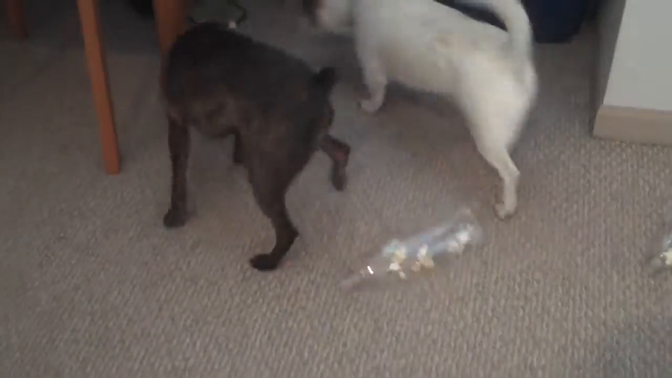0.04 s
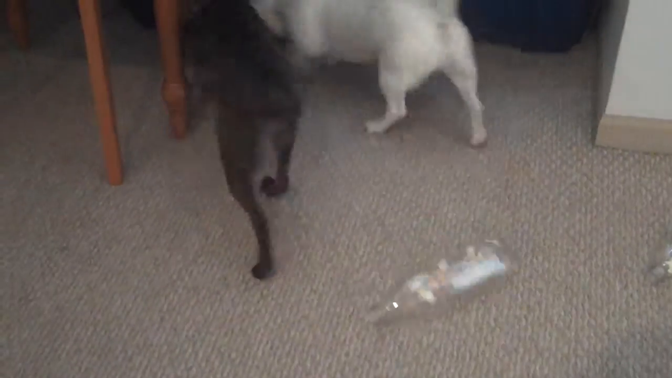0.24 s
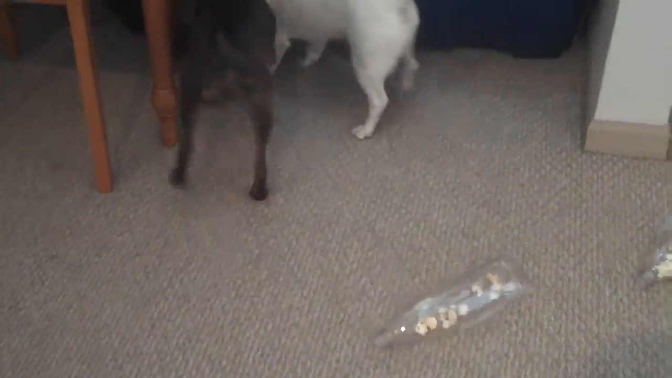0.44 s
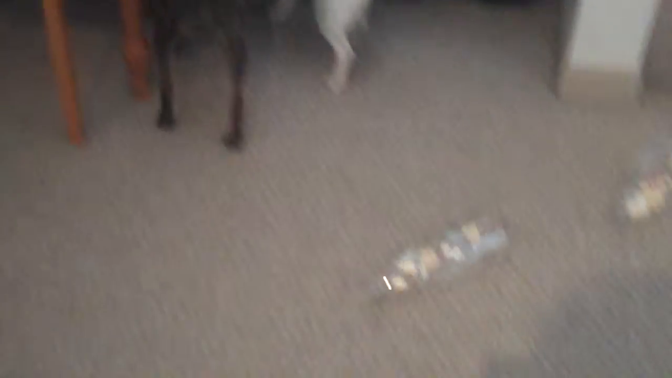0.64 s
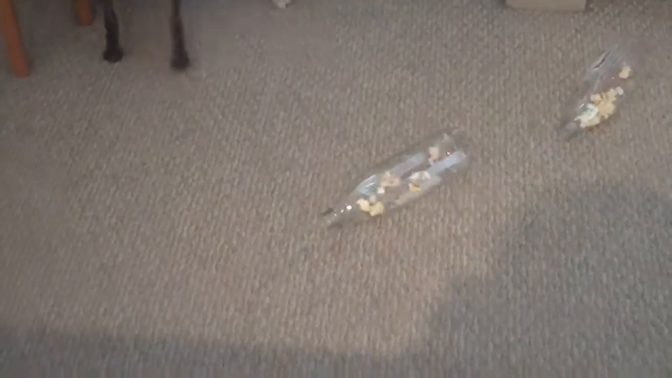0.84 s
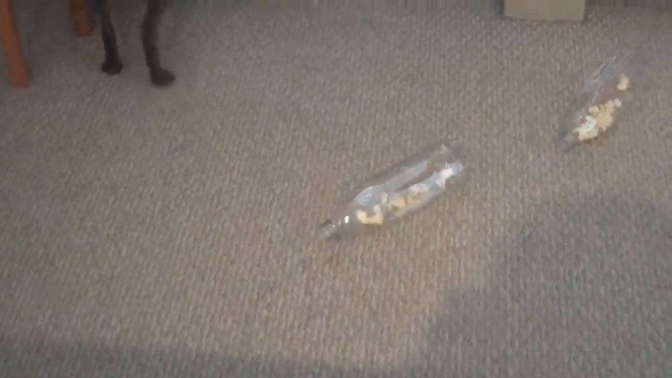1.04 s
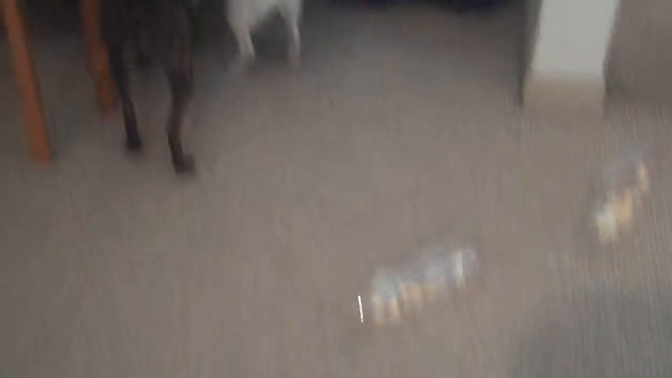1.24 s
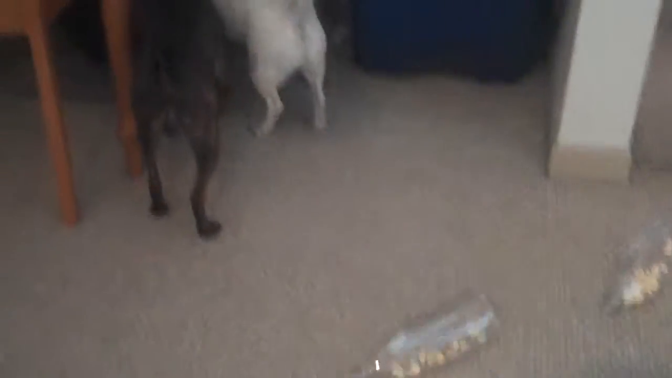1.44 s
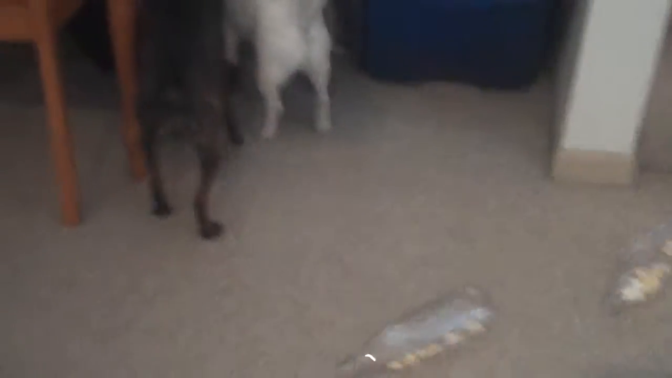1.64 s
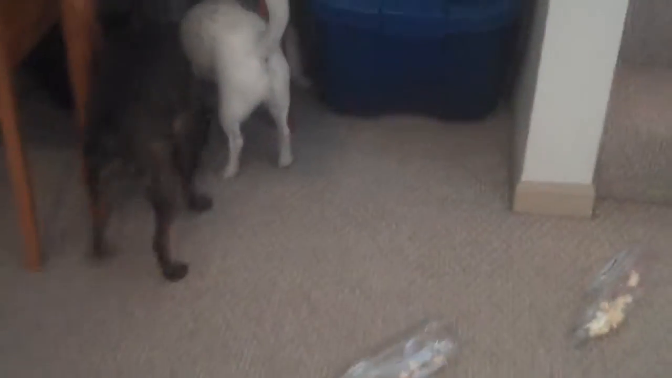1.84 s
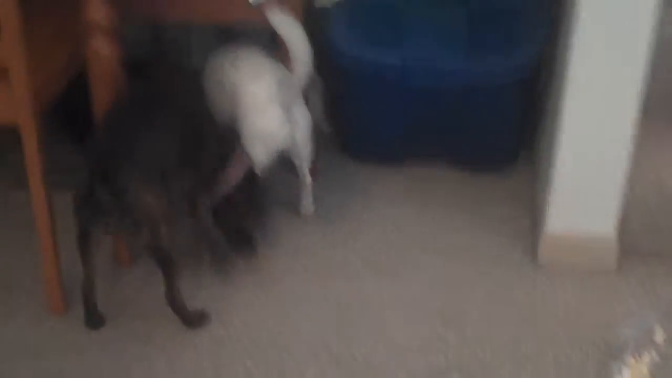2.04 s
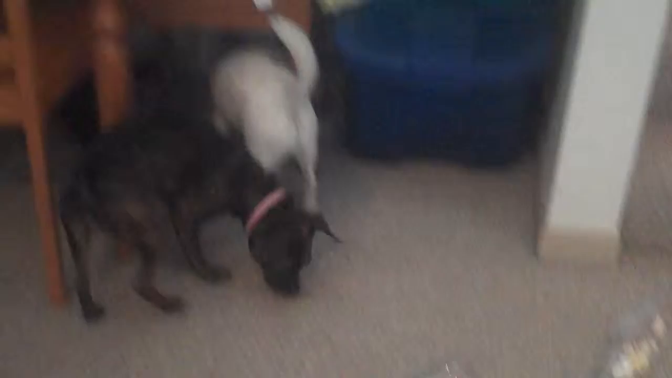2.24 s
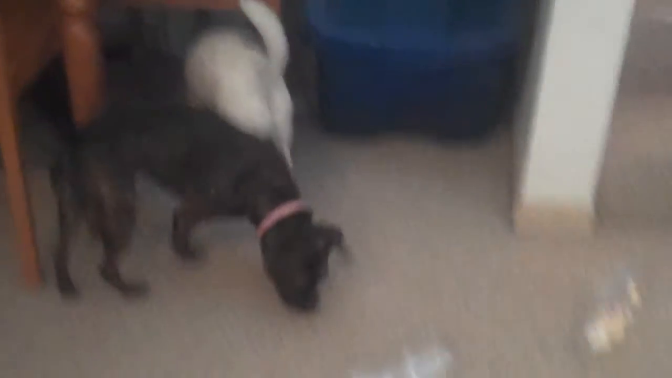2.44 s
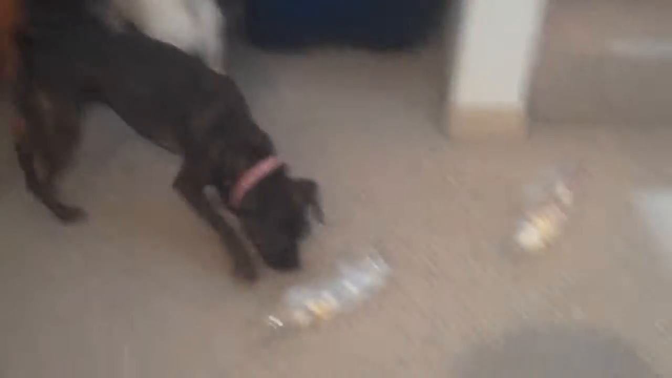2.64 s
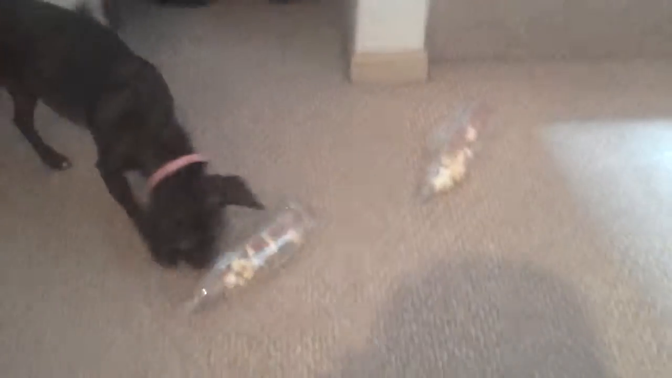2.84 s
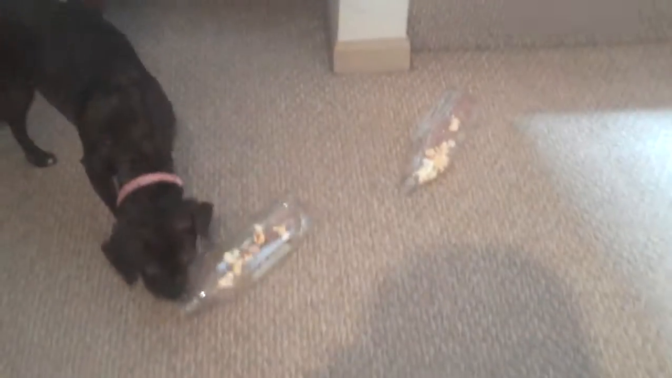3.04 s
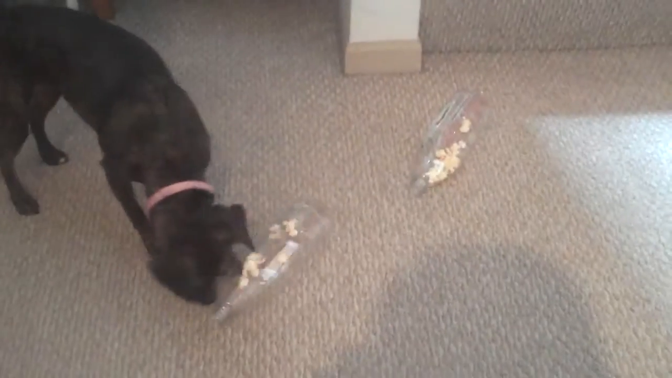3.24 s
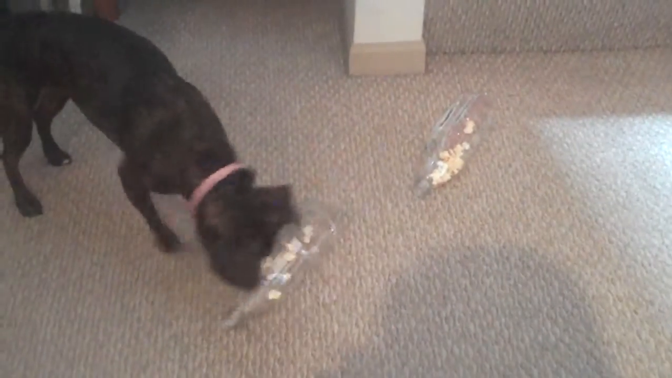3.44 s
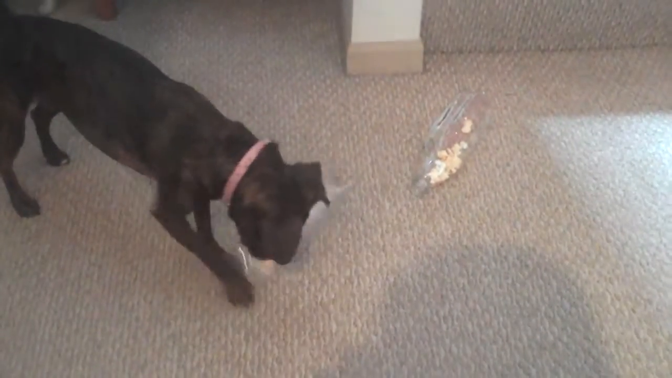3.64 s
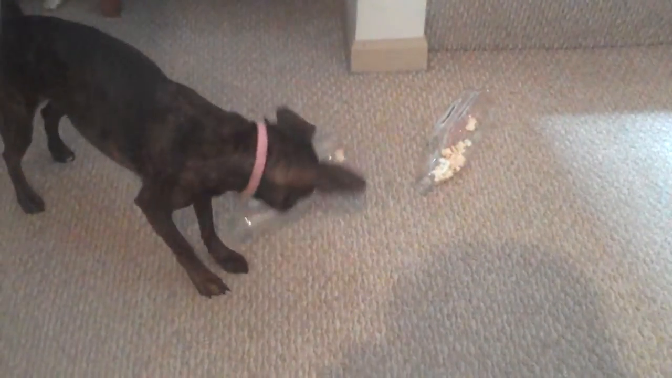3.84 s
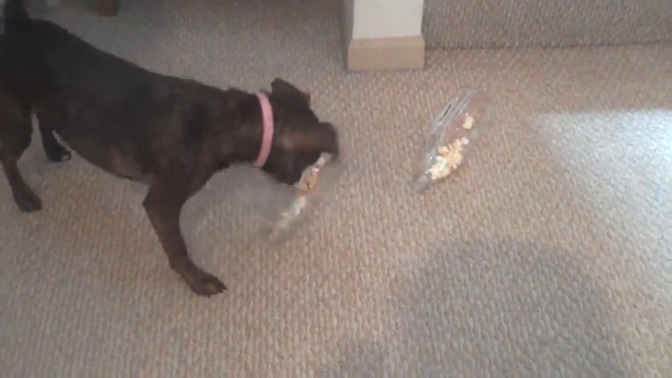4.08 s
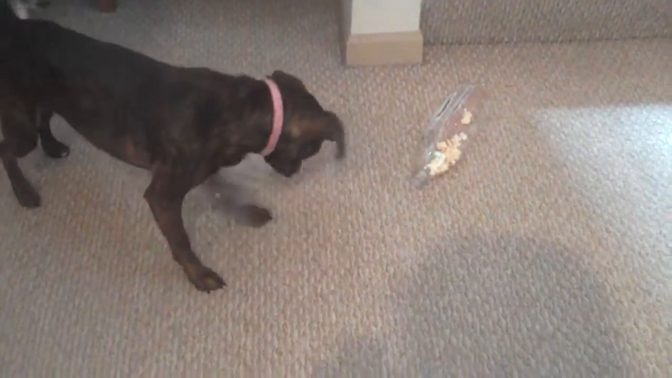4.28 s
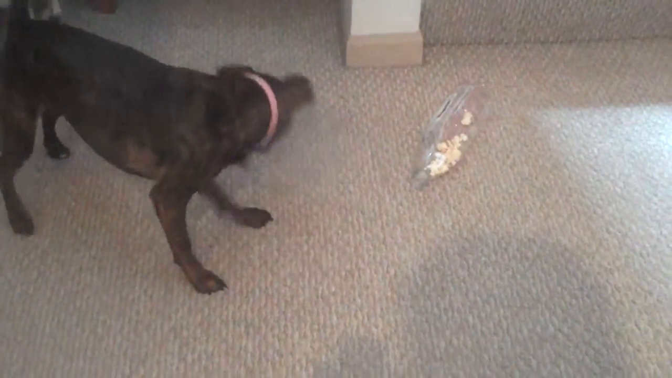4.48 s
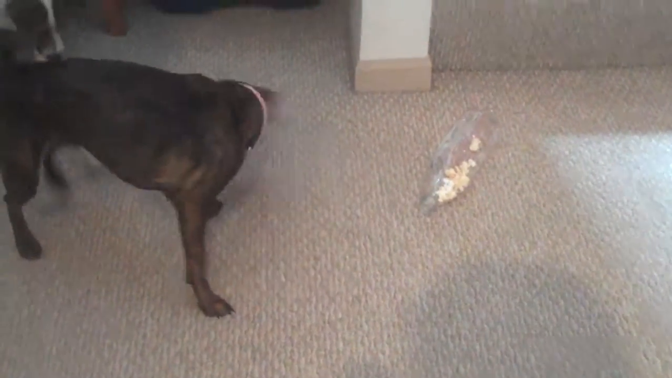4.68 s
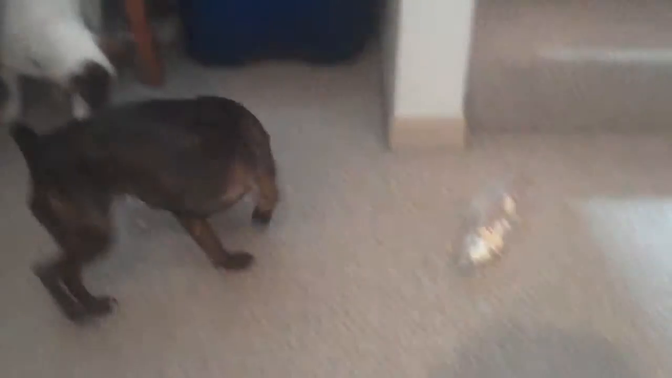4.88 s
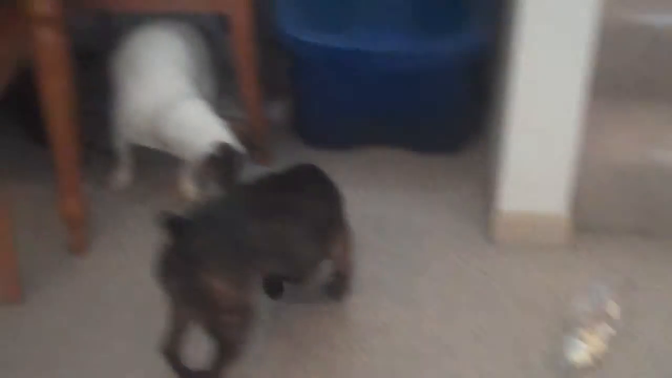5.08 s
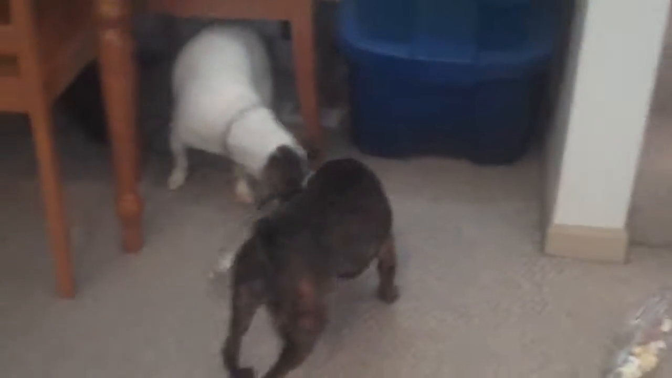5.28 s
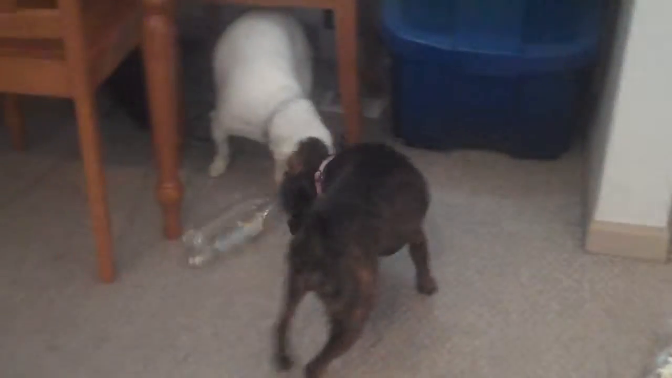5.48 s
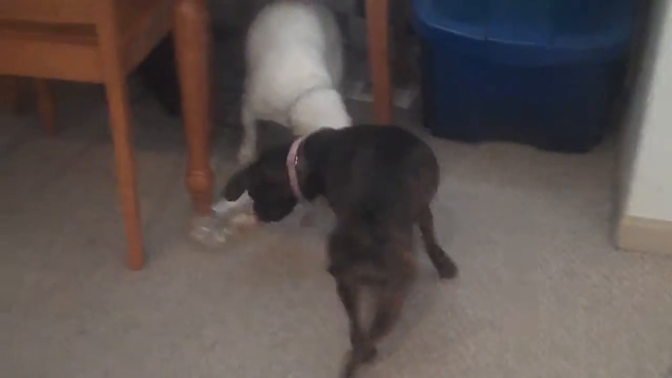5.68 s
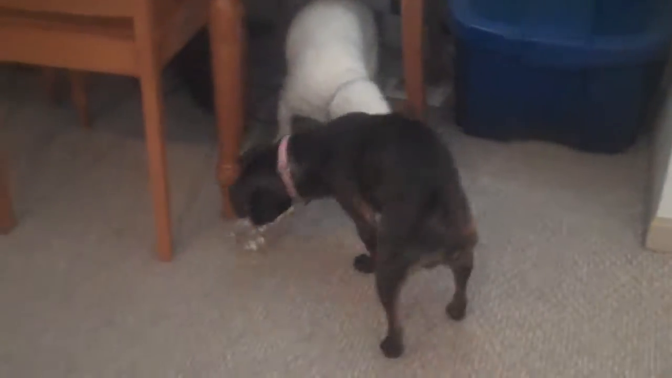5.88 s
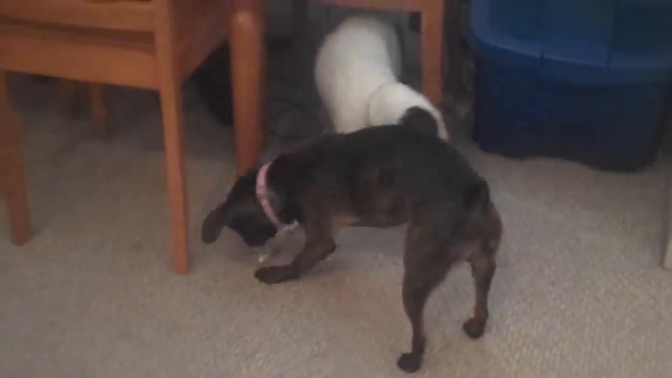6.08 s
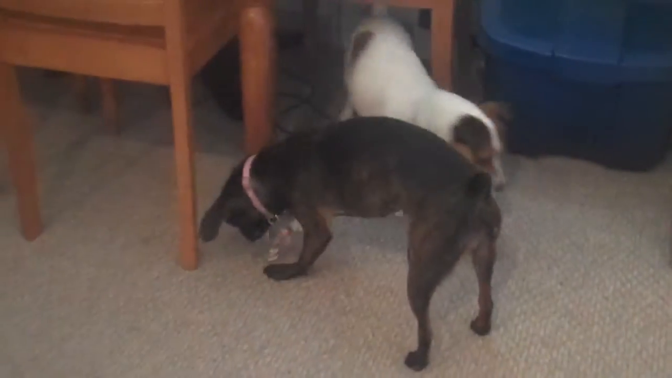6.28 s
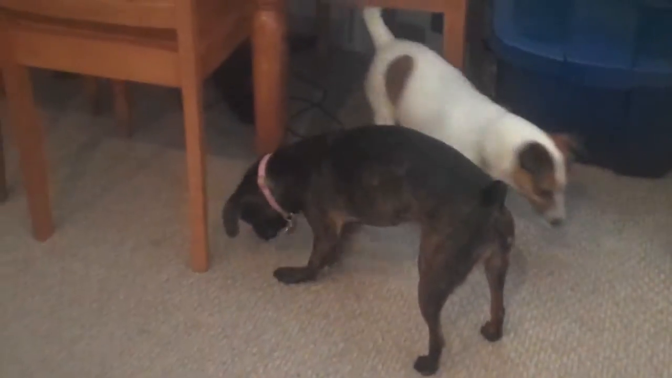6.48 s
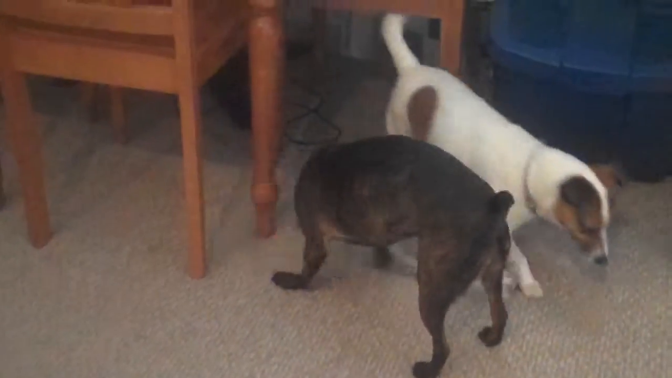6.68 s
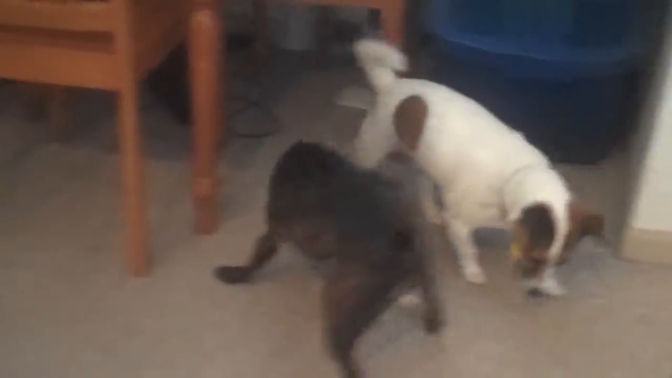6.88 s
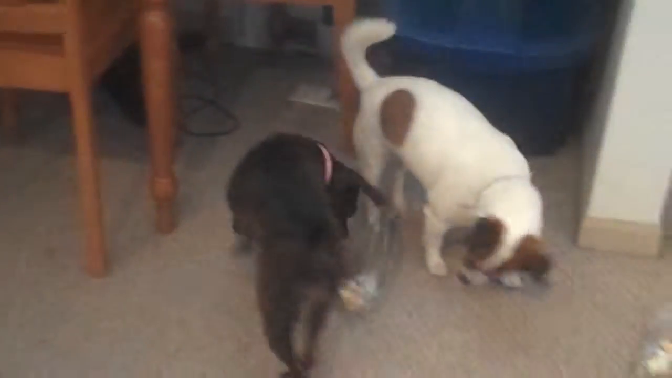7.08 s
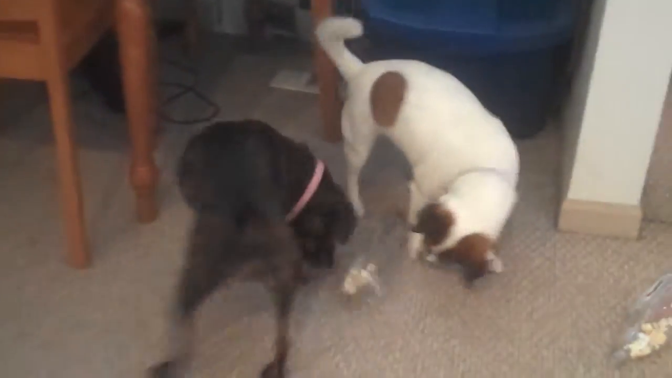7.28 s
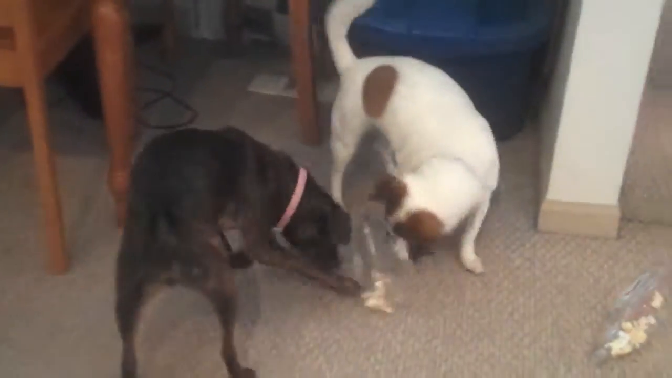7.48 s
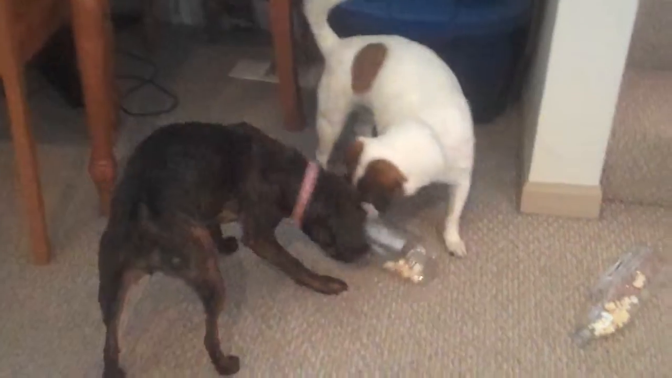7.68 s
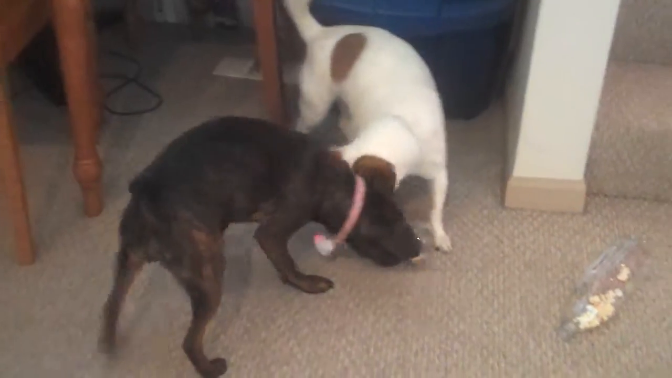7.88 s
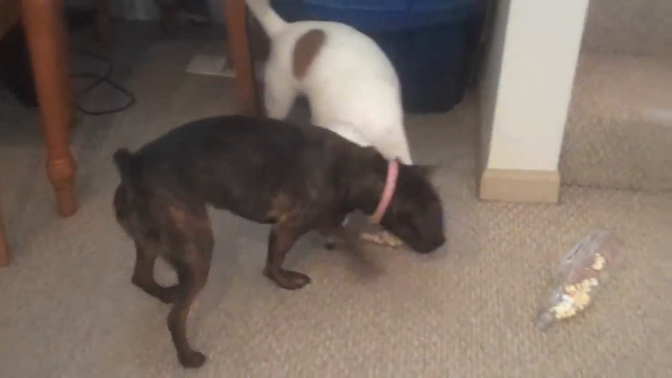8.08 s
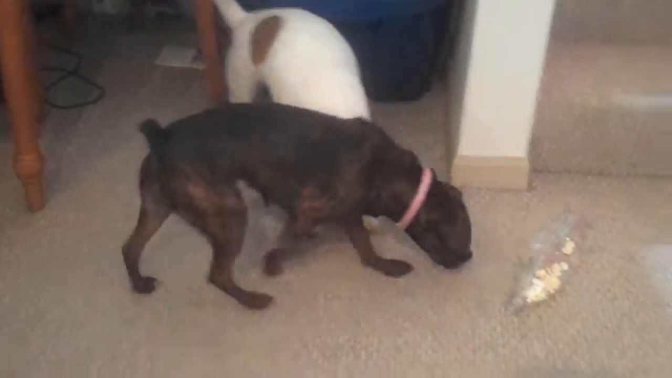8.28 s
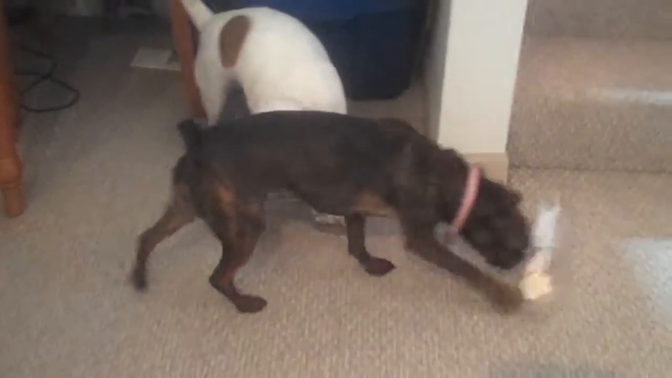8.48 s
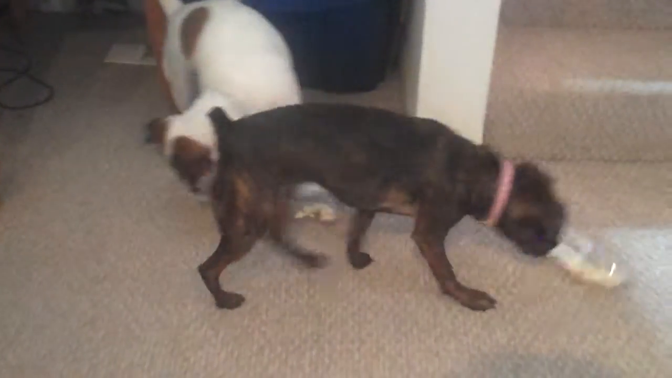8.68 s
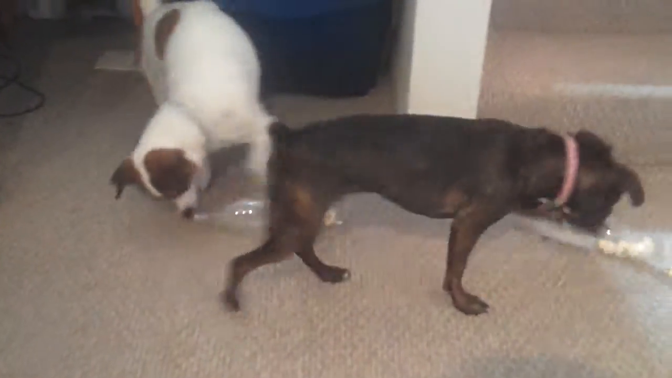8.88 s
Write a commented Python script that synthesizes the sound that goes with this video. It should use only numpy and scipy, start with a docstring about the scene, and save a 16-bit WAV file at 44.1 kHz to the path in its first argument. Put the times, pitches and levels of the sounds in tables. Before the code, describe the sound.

Plastic bottles holding popcorn crinkle, pop and knock on a carpeted floor as dogs push them, collar tags clinking over soft microphone hiss.

```python
"""Two dogs push thin plastic bottles of popcorn over a carpet in a furnished room, for 8.9 s. From the start
blows ring the bottles' modes, popcorn ticks, and drag and rustle of the pile are dense grains and shaped noise;
from 0.45 s metal collar tags clink as high decaying modes. From 3 s the plastic wall also sings in noise bands;
the hardest blows fall near 6 s, and clinks and rattle last to the end. Throughout, the hand-held microphone
adds shaped hiss, and the baseline drops with soft thumps and climbs back in small stairs."""
import sys
import numpy as np
from scipy import signal
from scipy.fft import rfft, irfft
from scipy.io import wavfile

SR = 44100
rng = np.random.default_rng(int(sys.argv[2]) if len(sys.argv) > 2 else 0)


def store_pcm(level_fs):
    """Save levels as 16-bit WAV."""
    pcm = np.round(np.clip(level_fs, -1, 1) * 32767).astype(np.int16)
    wavfile.write(sys.argv[1], SR, np.atleast_2d(pcm).T)


N = 393372

# blows on the bottles: t/s, reference level/dB, then level/dB above it for air inside, body, crack of a dent
BLOWS = [(0.014, -28.5, -24, -20.5, -27), (0.093, -35, -36, -12.5, -25), (0.341, -34, -17, -11, -20.5),
         (0.393, -30.5, -43, -22, -24), (0.445, -31.5, -37, -18, -14), (0.516, -31.5, -42, -16.5, -22),
         (1.059, -32, -37, -19, -28), (2.963, -37, -40, -21, -40), (2.995, -35, -41, -16, -38),
         (3.013, -28, -41, -22, -46), (3.0475, -29.5, -35, -30, -32), (3.149, -32.5, -32, -34, -17.5),
         (3.265, -26, -37, -28, -11), (3.2703, -28, -45, -12, -43), (3.427, -35, -28, -28, -18),
         (3.588, -48, -37, -31, -1), (3.624, -19.5, -47, -40, -14.5), (3.662, -24.5, -50, -44, -7.5),
         (3.719, -24.5, -39, -40, -6.5), (3.793, -22, -59, 0, -30), (3.984, -32, -4.5, -7, -4),
         (4.089, -24.5, -28, -15.5, -29), (4.129, -30, -14, -13, -16), (4.183, -28, -13.5, -5.5, -5.5),
         (4.332, -32.5, -5, -6, -12.5), (4.473, -28, -37, -21, -20.5), (4.565, -36, -15, -32, -14),
         (4.648, -40.5, -12, -4.5, -13), (4.841, -35, -21, -11, -14), (5.335, -23.5, -35, -17, -14.5),
         (5.524, -32, -43, -20, -20), (5.584, -38, -38, -8.5, -10), (5.657, -36, -26, -19, -19),
         (5.696, -31, -7, -6.5, -11), (5.786, -29, -44, -18, -19.5), (5.958, -21, -35, -10.5, -11.5),
         (6.017, -15.5, -34, -13.5, -14.5), (6.085, -39, -17, -2, -4.5), (6.226, -31, -15, -22, -19),
         (6.288, -25, -20, -6, -16), (6.367, -35, 9.5, -17, -28), (6.378, -9.5, -18.5, -11, -24),
         (6.403, -33, -40, -3, -32), (6.466, -21, -64, -49, -10), (6.53, -18.5, -11.5, -11, -16),
         (6.684, -32, -6, -18, -19), (6.754, -22, -19.5, -15.5, -1), (7.076, -32.5, -45, -40, -1),
         (7.435, -33.5, -17, -8.5, -22), (7.487, -28.5, -36, -17, -15.5), (7.573, -32, -25, -9, -7),
         (7.821, -34.5, -26, -18, -21), (7.911, -40, -35, -15, -26), (7.927, -35.5, -29, -17, -18),
         (8.091, -40, -21, -11, -33), (8.228, -32, -6, -8, -15.5), (8.245, -41, 7.5, -7.5, -22),
         (8.354, -45.5, -14, -4, -3), (8.418, -34.5, -45, -15, -12), (8.542, -27.5, -39, -15.5, -3),
         (8.571, -20, -47, -26, -11.5), (8.694, -33, -34, -30, -11), (8.738, -28, -43, -24, -22),
         (8.779, -23.5, -45, -26, -14.5), (8.882, -31, -23, -22, -14), (8.904, -29.5, -35, -10.5, -13.5)]
# bottle and floor modes: f/Hz, relative level/dB, t60/s
AIR_MODES = [(312, -8, .06), (435, -1, .05)]
BODY_MODES = [(471, -13, 0.1), (613, -7, 0.028), (745, -12, 0.03), (868, -10, 0.073), (1071, -3, 0.047),
              (1139, -1.5, 0.058)]
WALL_MODES = [(1147, -6, 0.04), (1344, -10.5, 0.067), (1700, 1, 0.0013), (1874, 2.5, 0.01),
              (1946, -11.5, 0.051)]
FLOOR_MODES = [(128.7, -8, 0.41), (209, 4, 0.036)]
FLOOR_DB = -11.5  # relative to the air inside
CRACK_HZ, CRACK_TOP_HZ = (2380, 4780), (4240, 9100)  # band edges
# a sharper crack leaves less for the wall
WALL_DB, WALL_LOSS_DB_PER_DB, MIDDLING_CRACK_DB = -9, 0.051, -16
PUNCH_HZ, PUNCH_DB = (420, 1180), 24  # the first contact pushes the whole body at once
BOUNCE_S, BOUNCE_LOSS_DB = 0.008, 4  # nominal spacing, loss per bounce


def bottles():
    """Modal excitation: a blow rings floor, air, body and wall; a buckling dent adds a noise crack."""
    s, peak_db, air_db, body_db, crack_db = np.transpose(BLOWS)
    blow_air_db, blow_body_db = peak_db + air_db, peak_db + body_db
    blow_crack_db = peak_db + crack_db

    # the floor thuds when the whole bottle lands
    floor = strike(s, blow_air_db + FLOOR_DB, FLOOR_MODES, spread_db=0.5)
    floor = band(floor, 217, 430)
    thud = strike(s, blow_air_db - 5.0, AIR_MODES, spread_db=3.0, detune=0.04)
    air = 0.88 * band(thud, 210, 480) + neck(s, blow_air_db)

    # the light bottle bounces three times
    turn = np.arange(4)
    bounce_s = s[:, None] + BOUNCE_S * turn * (0.7 + 0.546 * rng.random((len(s), 4)))
    bounce_db = blow_body_db[:, None] - BOUNCE_LOSS_DB * turn
    body = strike(bounce_s.ravel(), bounce_db.ravel(), BODY_MODES, spread_db=3.0, detune=0.055)
    body = band(body, 340, 1200)
    body += band(clicks(s, -amp(blow_body_db + PUNCH_DB)), *PUNCH_HZ)

    # the wall gives in three quick steps
    wall_db = WALL_DB - WALL_LOSS_DB_PER_DB * (crack_db - MIDDLING_CRACK_DB)
    flex_s = s[:, None] + 0.004 * rng.random((len(s), 3))
    flex_db = np.repeat(peak_db + wall_db - 5.5, 3)
    wall = strike(flex_s.ravel(), flex_db, WALL_MODES, spread_db=3.5, detune=0.057)
    wall = band(wall, 1100, 4300)

    crack = burst(s, blow_crack_db + 7.0, CRACK_HZ, 0.0024)
    crack += burst(s, blow_crack_db + 0.5, CRACK_TOP_HZ, 0.0025)
    return floor + air + body + wall + crack


NECK_HZ, NECK_SHARP_HZ, NECK_SAG_S = 311.3, 11.5, 0.02  # starts sharp, sags to its pitch
NECK_SWELL_S, NECK_DB = 0.024, -14.5


def neck(s, db):
    """Air resonance of the neck: a hum that swells and dies after a blow, each a little off its pitch."""
    t = np.arange(SR // 4) / SR
    out, chance = np.zeros(N + len(t)), rng.standard_normal((len(s), 2))
    swell = t / NECK_SWELL_S * np.exp(1 - t / NECK_SWELL_S)
    # the integral of the sagging frequency
    sag_cycles = NECK_SHARP_HZ * NECK_SAG_S * np.exp(-t / NECK_SAG_S)
    for start, gain, (off, turn) in zip((s * SR).astype(int), amp(db + NECK_DB), chance):
        cycles = NECK_HZ * (1 + 0.029 * off) * t - sag_cycles
        out[start:start + len(t)] += gain * swell * np.sin(2 * np.pi * cycles + 2 * turn)
    return out[:N]


# collar tags: t/s, reference level/dB of the touch, then level/dB above it for the ring
# of the round, the thick and the far tag
CLINKS = [(0.45, -36, -41, -19, -6), (0.7255, -22.5, -34, -25, -12.5), (0.7477, -30, -23, -30, -20),
          (0.878, -32, -31, -27, -29), (0.917, -37, -31, -20, -16), (0.993, -44, -9, -10, -6.5),
          (1.079, -33.5, -19, -5.5, -8.5), (1.228, -37.5, -12, -7.5, -15), (1.275, -33.5, -17, -16, -30),
          (1.2882, -33.5, -4, -5.5, -25), (1.33, -32, -25, -25, -28), (1.393, -45, -38, -13, 1),
          (1.417, -38.5, -31, -11, -3.5), (1.594, -35.5, -28, -27, -20), (1.7876, -39, -21, -7, -17),
          (1.8019, -23.5, -16, -14, -12), (1.8919, -29.5, -12.5, -12.5, -24), (2.23, -37.5, -33, -32, -26),
          (2.382, -37.5, -18, -27, -29), (2.432, -55, -35, -25, -30), (2.448, -29, -28, -30, -28),
          (2.456, -35.5, -2, -26, -25), (2.541, -36.5, -22, -9.5, -24), (2.577, -32, -32, -33, -30),
          (2.7093, -35, -5, -25, -30), (2.724, -31.5, -12, -10.5, -27), (2.7492, -32, -19, -16, -24),
          (2.949, -39, -22, -25, -30), (3.07, -49, -19, -4, -14), (3.355, -46, -30, -8, -20),
          (4.402, -44, -35, -10, -16.5), (4.565, -14, -23.5, -28, -45), (4.5875, -41.5, -30, 8, -23),
          (4.7504, -43.5, -1, -13, -19), (4.785, -34.5, -5.5, -29, -35), (4.835, -38, -35, -21, -14),
          (4.87, -34.5, -23, -9.5, -24), (5.04, -35, -16, -32, -17.5), (5.153, -41.5, -9, -14, -30),
          (5.184, -36, -6, -5, -30), (5.299, -29, -9, -31, -31), (5.4911, -37, -8, -3.5, -30),
          (5.8987, -31.5, -33, -36, -38), (6.146, -41, -1, -21, -4), (6.226, -21, -13.5, -27, -12.5),
          (6.303, -28, -20, -17, -30), (6.908, -19.5, -27, -23, -32), (7.0262, -32, -28, -14.5, -14),
          (7.215, -39, -30, -38, -38), (7.276, -30, -4.5, -14, -24), (7.431, -37, -4, -26, -17),
          (7.524, -24.5, -21, -14.5, -38), (8.073, -44.5, -34, -20, -9), (8.232, -39, -30, -25, -8),
          (8.245, -28.5, -35, -17, -21), (8.337, -25.5, -28, -35, -25), (8.356, -30.5, -31, -30, -5),
          (8.4205, -29, -17, -17, -13), (8.6934, -48, -9, -30, -24), (8.7842, -23, -16, -34, -42),
          (8.858, -27.5, -26, -29, -24), (8.904, -22, -18, -9.5, -25)]
# tag modes: f/Hz, relative level/dB, t60/s
ROUND_TAG_MODES = [(4510, -16, .11), (6790, -7, .16), (6835, -2, .18), (8800, -14, .05), (9920, -4, .17),
                   (12600, -9, .08), (12700, -6, .13), (13200, -14, .05)]
THICK_TAG_MODES = [(8300, -12, .1), (9550, -10, .08), (10450, -6, .1), (10620, -4, .15), (10780, -1, .12),
                   (10950, -5, .12), (11250, -9, .08)]
FAR_TAG_MODES = [(7900, -20, .06), (8400, -15, .06), (9000, -18, .06), (10120, 0, .16), (11580, -4, .12),
                 (11900, -12, .06), (12650, -18, .08)]
# split rings, a cluster of brief modes that never sound twice alike: f/Hz, relative level/dB, t60/s
SPLIT_RING_MODES = [(7450, -12.5, 0.034), (8500, -4, 0.014), (9500, -1.5, 0.015), (9660, -13.5, 0.024),
                    (10230, 4.5, 0.025), (10530, -30, 0.023)]


def tags():
    """Repeated impact of small plates: each swing brings a touch and three weaker rebounds within 80 ms."""
    s, peak_db, *ring_db = np.transpose(CLINKS)
    chance = rng.random((len(s), 3, 2))
    late_s = np.cumsum(0.0014 + 0.024 * chance[..., 0], axis=1)
    times = np.hstack([s[:, None], s[:, None] + late_s]).ravel()
    rebound_db = -3 - 350 * late_s - 8 * chance[..., 1]
    contact_db = peak_db[:, None] + np.hstack([0 * s[:, None], rebound_db])

    out = burst(times, contact_db.ravel() - 9.0, (7000, 12000), 0.002)
    out += burst(s, peak_db - 18.5, (1000, 6000), 0.0019)
    tag_modes = (ROUND_TAG_MODES, THICK_TAG_MODES, FAR_TAG_MODES)
    for db, modes, gain_db in zip(ring_db, tag_modes, (-10.5, -11, -12)):
        tag_db = (contact_db + db[:, None] + gain_db).ravel()
        out += strike(times, tag_db, modes, spread_db=4.5, wobble=1.5, detune=0.004)
    loudest_db = np.max(ring_db, axis=0)[:, None]
    split_db = (contact_db + loudest_db - 13.5).ravel()
    out += strike(times, split_db, SPLIT_RING_MODES, spread_db=8.0, detune=0.029)
    # the split rings chatter on with the thick tag
    return out + burst(s, peak_db + ring_db[1] - 15, (7000, 11400), 0.018)


# popcorn flicked against the wall: t/s, peak level/dB, centre f/Hz
FLICKS = [(0.132, -41, 2040), (0.149, -54, 3000), (0.313, -46, 2010), (0.582, -45, 1980),
          (0.795, -43, 3000), (0.997, -41, 2300), (3.004, -41, 1790), (3.01, -49, 1800), (3.05, -35, 2530),
          (3.108, -48, 2200), (3.117, -42, 2200), (3.121, -45, 2100), (3.15, -35.5, 2550),
          (3.451, -26.5, 3170), (3.759, -30, 3500), (3.814, -27, 3260), (3.8274, -48, 3350),
          (3.884, -33, 5040), (3.896, -29, 2700), (3.912, -36, 2960), (4.01, -38, 2660), (4.024, -29, 2430),
          (4.049, -38, 4200), (4.198, -40, 2600), (4.314, -39, 2920), (4.348, -32.5, 2450),
          (4.543, -36, 2100), (4.672, -42, 2010), (4.755, -38.5, 2620), (4.91, -41, 2200),
          (5.436, -43, 1800), (5.537, -39, 1900), (5.551, -36, 1960), (5.572, -42, 2600),
          (5.595, -47, 4000), (5.621, -55, 1800), (5.74, -42, 1790), (5.83, -40, 7200), (5.971, -30, 2800),
          (6.2272, -34.5, 3420), (6.776, -21, 3730), (6.79, -32, 4500), (6.81, -30, 3200),
          (7.217, -40.5, 5000), (7.464, -44, 1750), (7.488, -36, 2400), (7.517, -42, 1800),
          (7.848, -41.5, 2540), (7.947, -41.5, 3350), (8.021, -46, 4000), (8.131, -47, 4200),
          (8.32, -55, 1980), (8.5452, -23, 3300), (8.5783, -20, 4400), (8.619, -44, 5220)]


def flicks():
    """Short impact noise: each tick is a brief noise pulse in a band around its own centre."""
    t = np.arange(int(0.012 * SR)) / SR
    out, noise = np.zeros(N + len(t)), rng.standard_normal((len(FLICKS), len(t)))
    for (s, db, hz), row in zip(FLICKS, noise):
        pulse = row * t * np.exp(-t / 0.0007)
        tick = band(band(pulse, hz / 1.5, hz * 1.4), hz / 2, hz * 2)
        start = int(s * SR)
        out[start:start + len(t)] += amp(db) * tick / np.abs(tick).max()
    return out[:N]


# singing plastic wall: t/s, level/dB before a common lift, centre f/Hz, swell/s, edge-to-centre ratio
SINGS = [(3.0, -51.5, 1770, 0.0084, 1.37), (3.271, -42, 1010, 0.014, 1.18), (3.452, -60, 3220, 0.021, 1.15),
         (3.722, -38, 1840, 0.005, 1.15), (6.463, -25, 1910, 0.0021, 1.12), (6.76, -44.5, 3900, 0.031, 1.3),
         (7.08, -55.5, 3040, 0.035, 1.1), (7.93, -51, 1110, 0.025, 1.13), (8.02, -54, 1056, .04, 1.05),
         (8.14, -58, 3270, 0.027, 0.99), (8.24, -73, 3400, 0.044, 0.99), (8.36, -57, 3240, 0.035, 0.89),
         (8.548, -51.5, 3550, 0.041, 1.12)]


def sings():
    """Band-limited resonance: the wall sings after a crack or while it scrapes, as noise that swells and dies."""
    out = 0
    for s, db, hz, swell_s, ratio in SINGS:
        ratio = max(ratio, 1.04)
        out = out + burst([s], db + 15, (hz / ratio, hz * ratio), swell_s)
    return out


# movement on the carpet: t/s, drag level/dB, rustle level/dB
SCUFF = [(0.0, -46.5, -64), (0.17, -59, -82), (0.62, -52.5, -66), (2.08, -60.5, -74), (2.93, -62.5, -69),
         (3.3, -59, -70.5), (3.68, -52.5, -61), (3.785, -44, -65), (3.82, -49, -56), (3.96, -43, -63),
         (4.1, -48, -62), (4.44, -52.5, -62.5), (4.68, -55.5, -56), (4.9, -53, -66.5), (5.24, -70, -72),
         (5.45, -65, -64.5), (5.61, -50, -54.5), (5.89, -60, -67.5), (6.1, -61, -59), (6.25, -52.5, -58.5),
         (6.61, -43, -55.5), (7.13, -59.5, -58), (7.5, -73, -67), (7.75, -67, -69), (7.95, -56, -76),
         (8.2, -58.5, -57.5), (8.52, -69, -66), (8.75, -46, -48), (8.92, -54.5, -63)]
# noise spectra: f/Hz, relative level/dB per Hz
DRAG_SPECTRUM = [(71, -71), (120, -2), (246, -2.5), (305, 6.5), (371, -8), (421, 4.5), (575, -2.5),
                 (1050, 8.5), (1520, 7.5), (3500, -10), (4550, -81), (7700, -120)]
RUSTLE_SPECTRUM = [(1800, -50), (2600, 9.5), (4000, 1), (6000, 5.5), (9000, -14), (14000, -32)]
# popcorn rattles on after every blow: offsets from the body and crack levels, time to build and to die
RATTLE_DB, RATTLE_RUSTLE_DB, RATTLE_RISE_S, RATTLE_DIES_S = -7.5, -18, 0.00071, 0.066


def scuffs():
    """Friction as many small contacts: popcorn and plastic drag, fur and pile rustle; blows stir both."""
    drag_db, rustle_db = in_time(SCUFF)
    s, peak_db, _, body_db, crack_db = np.transpose(BLOWS)
    dull = after(s, peak_db + RATTLE_DB + body_db, RATTLE_RISE_S, RATTLE_DIES_S)
    bright = after(s, peak_db + RATTLE_RUSTLE_DB + crack_db, RATTLE_RISE_S, RATTLE_DIES_S)

    drag = 0.5 * grains(1700, 2.6, low_hz=750, high_hz=2900, cycles=8.0)
    drag += 0.45 * coloured(rng.standard_normal(N), DRAG_SPECTRUM)
    rustle = 0.67 * grains(1500, 3.0, low_hz=2500, high_hz=8900, cycles=6.0)
    rustle += 0.6 * coloured(rng.standard_normal(N), RUSTLE_SPECTRUM)

    jerks = amp(1.9 * wander(30.0))  # the push comes in jerks
    return jerks * (np.hypot(amp(drag_db), dull) * drag + np.hypot(amp(rustle_db), bright) * rustle)


# reverberation: f/Hz, t60/s
ROOM_T60 = [(150, 0.7), (500, 0.69), (1200, 0.64), (3000, 0.25), (7000, 0.45), (13000, 0.34)]
# early echoes: delay t/s, level/dB
ECHOES = [(.0075, -15), (0.029, -18)]
TAIL_DB = -6


def room(x):
    """Reverberation: direct sound, a few early echoes, then a diffuse tail that dies band by band."""
    t, edges = np.arange(SR // 2) / SR, 100 * 2 ** np.arange(0, 7.3, 0.6)
    tail = 0
    for low, high in zip(edges, edges[1:]):
        decay = amp(-60 * t / at_hz(ROOM_T60, np.sqrt(low * high)))
        tail = tail + band(rng.standard_normal(len(t)), low, high) * decay
    tail *= 1 - np.exp(-t / 0.0027)  # the tail needs a moment to build up
    response = amp(TAIL_DB) * tail / np.sqrt(np.sum(tail ** 2))
    response[0] += 1
    for s, db in ECHOES:
        response[int(s * SR)] += amp(db)
    return signal.fftconvolve(x, response)[:N]


# the baseline drops with a soft thump: t/s, step level/dB
DROPS = [(0.729, -50.5), (1.799, -51.5), (2.46, -57.5), (2.722, -57), (4.215, -56.5), (4.569, -43.5),
         (4.588, -50), (4.79, -61), (6.227, -47.5), (6.302, -50.5), (8.359, -49), (8.786, -49),
         (8.903, -42.5)]
# it climbs in runs of small evenly timed stairs: first t/s, last t/s, first stair level/dB
CLIMBS = [(0.0, .63, -67), (1.093, 1.14, -57), (2.185, 2.23, -58), (3.07, 3.12, -57), (5.137, 5.18, -61),
          (5.547, 5.73, -60), (6.648, 6.73, -60), (7.257, 7.27, -56), (7.897, 7.94, -57),
          (8.705, 8.75, -57)]
# short spikes where the baseline drops: t/s, level/dB, signed direction factor
SPIKES = [(4.5664, -28.5, 0.92), (4.5733, -39, -1.1), (4.588, -33, -0.96), (8.788, -50, -1),
          (8.904, -33, -1.3)]
STAIR_S, STAIR_GROWS_DB_PER_S, CREEP_S = 0.0355, 14, 0.11
SPIKE_S, RUMBLE_DB = 0.00015, -77


def baseline_steps():
    """Relaxation: baseline drops and stairs creep back to rest, with brief spikes, over a faint rumble."""
    s, db = np.transpose(DROPS)
    moves = -clicks(s, amp(db))
    for first_s, last_s, stair_db in CLIMBS:
        later = np.arange(0, last_s - first_s, STAIR_S)
        moves += clicks(first_s + later, amp(stair_db + STAIR_GROWS_DB_PER_S * later))
    baseline = signal.lfilter([1], [1, -np.exp(-1 / (CREEP_S * SR))], moves)

    s, db, direction = np.transpose(SPIKES)
    baseline += swell_and_die(clicks(s, direction * amp(db)), SPIKE_S)
    soft = signal.sosfilt(signal.butter(1, 700, fs=SR, output="sos"), baseline)
    rumble = rms_one(band(rng.standard_normal(N), 1.3, 31))
    return soft + amp(RUMBLE_DB) * rumble


# hiss spectrum: f/Hz, relative level/dB
HISS_SPECTRUM = [(35, -54), (60, -3), (364, -2), (489, 5.5), (738, -1), (1090, -2.5), (1920, 2.5),
                 (2700, -13.5), (4790, -11), (10200, -13.5), (14000, -18)]
HISS_DB = -64.5


def hiss():
    """Stationary noise: the microphone's soft hiss has a fixed spectrum and level."""
    return amp(HISS_DB) * coloured(rng.standard_normal(N), HISS_SPECTRUM)


def strike(s, db, modes, spread_db, wobble=0, detune=0):
    """Modal superposition: each contact rings each mode at a random strength, sign and slight tuning;
    a turning object wobbles."""
    out, chance = 0, rng.standard_normal((len(s), len(modes), 2))
    tuning = rng.integers(-1, 2, (len(s), len(modes)))  # flat, true or sharp
    for k, (hz, mode_db, t60) in enumerate(modes):
        r, ring = amp(-60 / (t60 * SR)), 0
        gain = amp(db + mode_db + spread_db * chance[:, k, 0]) * np.sign(chance[:, k, 1])
        for step in range(-1, 2):
            w = 2 * np.pi * hz * (1 + detune * step) / SR
            hits = clicks(s, gain * (tuning[:, k] == step))
            ring = ring + signal.lfilter([0, np.sin(w)], [1, -2 * r * np.cos(w), r * r], hits)
        out = out + ring * (1 + wobble * wander(74.0) if wobble else 1)
    return out


def swell_and_die(impulses, length_s):
    """Critically damped response: each impulse becomes a pulse that peaks after length_s."""
    r = np.exp(-1 / (length_s * SR))
    return signal.lfilter([np.e * (1 - r)], [1, -2 * r, r * r], impulses)


def burst(s, db, edges_hz, length_s):
    """Impact noise: puffs of band noise that swell briefly and die."""
    noise = swell_and_die(clicks(s, amp(db)), length_s) * rng.standard_normal(N)
    return band(band(noise, *edges_hz), *edges_hz)


def grains(per_s, spread_db, low_hz, high_hz, cycles):
    """Random point process: tiny uneven contacts, each ringing a few cycles at one of eight pitches."""
    sizes = amp(spread_db * np.minimum(rng.exponential(1, N), 4)) * rng.standard_normal(N)
    born = rng.random(N) < per_s * amp(4 * wander(5)) / SR
    dealt, out = rng.integers(0, 8, N), 0
    for k, hz in enumerate(np.geomspace(low_hz, high_hz, 8)):
        r = amp(-60 * hz / (cycles * SR))
        poles = [1, -2 * r * np.cos(2 * np.pi * hz / SR), r * r]
        out = out + signal.lfilter([1, 0, -1], poles, sizes * born * (dealt == k))
    return rms_one(out)


def after(s, db, rise_s, dies_s):
    """Energy addition: a level that swells after each event and dies; powers add."""
    power = clicks(s, amp(db) ** 2)
    rise, fall = np.exp(-1 / (rise_s * SR)), np.exp(-2 / (dies_s * SR))
    dying = signal.lfilter([1], [1, -fall], power)
    return np.sqrt(signal.lfilter([1 - rise], [1, -rise], dying))


def wander(rate_hz):
    """Low-passed noise: a slow random fluctuation of rms 1."""
    r = np.exp(-32 * np.pi * rate_hz / SR)  # made at a sixteenth of the sample rate
    slow = signal.lfilter([1], [1, -2 * r, r * r], rng.standard_normal(N // 16 + 502))[500:]
    return np.interp(np.arange(N) / 16, np.arange(len(slow)), rms_one(slow))


def coloured(x, spectrum):
    """Spectral shaping: weight a random signal by a spectrum; rms 1."""
    hz = np.maximum(np.arange(N // 2 + 1) * SR / N, 1)
    return rms_one(irfft(rfft(x) * amp(at_hz(spectrum, hz)), N))


def clicks(s, gain):
    """Impulse excitation at given times."""
    out = np.full(N, 1e-18)
    np.add.at(out, np.clip((np.ravel(s) * SR).astype(int), 0, N - 1), np.ravel(gain))
    return out


def band(x, low_hz, high_hz):
    """Butterworth band-pass filtering."""
    return signal.sosfilt(signal.butter(2, [low_hz, high_hz], "band", fs=SR, output="sos"), x)


def in_time(rows):
    """Linear interpolation: columns of a curve at every sample."""
    s, *columns = np.transpose(rows)
    return [np.interp(np.arange(N) / SR, s, c) for c in columns]


def at_hz(points, hz):
    """Interpolation of a table on a log-frequency axis."""
    table_hz, values = np.transpose(points)
    return np.interp(np.log(hz), np.log(table_hz), values)


def rms_one(x):
    """Normalisation to rms 1."""
    return x / np.sqrt(np.mean(x ** 2) + 1e-20)


def amp(db):
    """Decibel law: level to amplitude gain."""
    return 10 ** (np.asarray(db) / 20)


def scene():
    """Superposition: reverberant sources plus scuffs, hiss and baseline steps."""
    sources = bottles() + tags() + flicks() + sings()
    return (room(sources) + scuffs() + hiss() + baseline_steps())[None]


def record(dry):
    """Low-pass filtering: the top is cut, by 50 dB from 14.3 kHz up."""
    return signal.sosfilt(signal.cheby2(12, 50, 14300, fs=SR, output="sos"), dry)


dry = scene()
out = record(dry)
store_pcm(out)
```